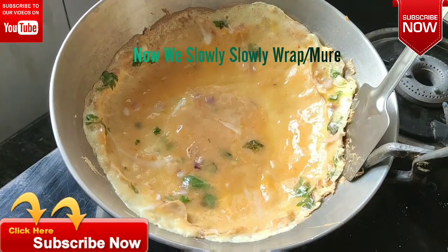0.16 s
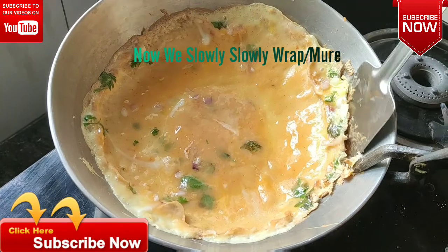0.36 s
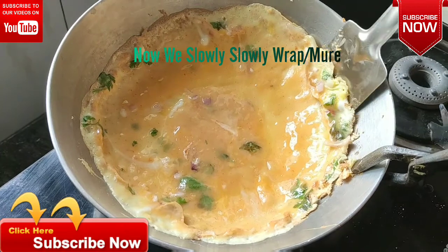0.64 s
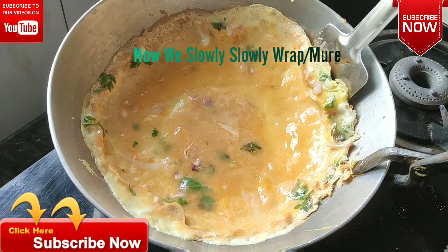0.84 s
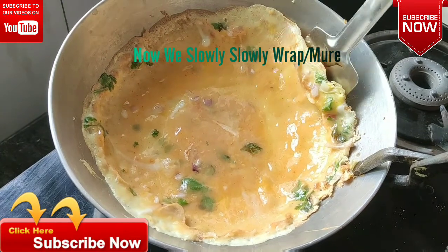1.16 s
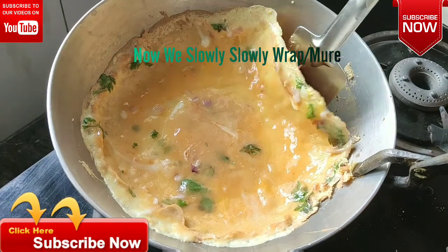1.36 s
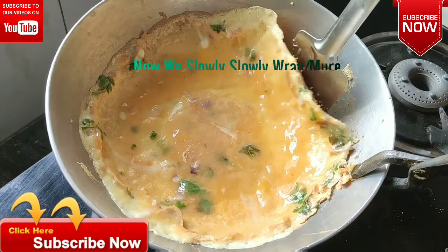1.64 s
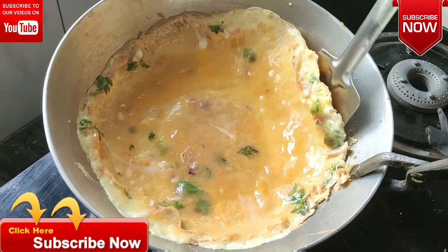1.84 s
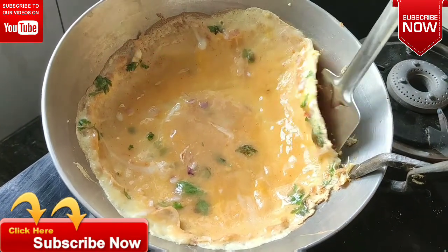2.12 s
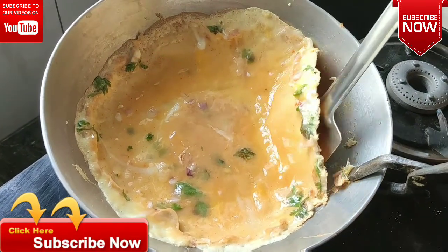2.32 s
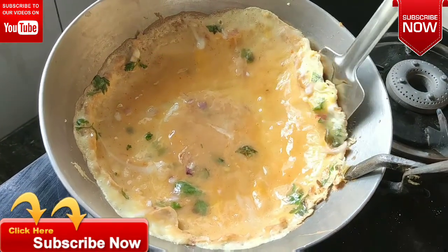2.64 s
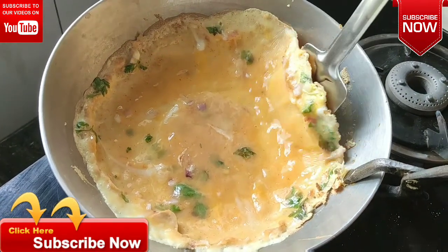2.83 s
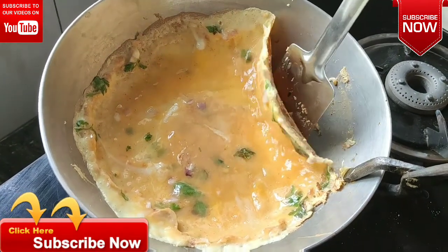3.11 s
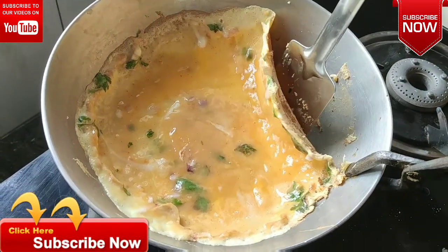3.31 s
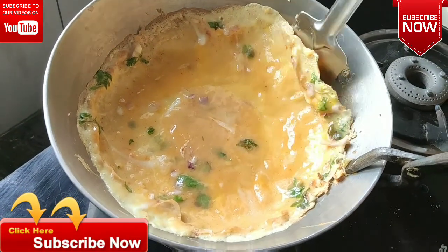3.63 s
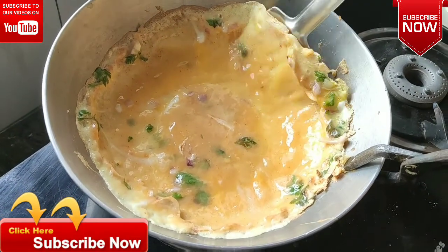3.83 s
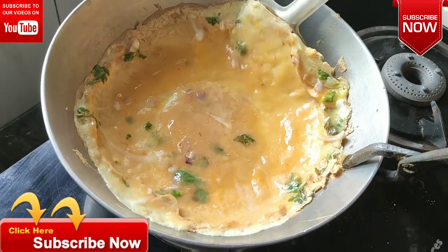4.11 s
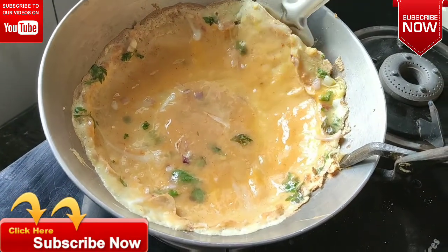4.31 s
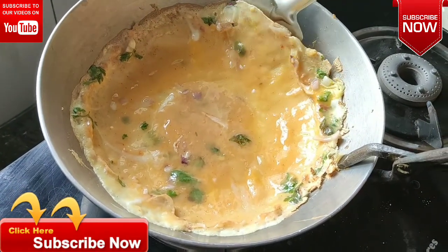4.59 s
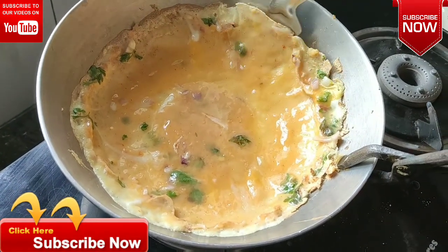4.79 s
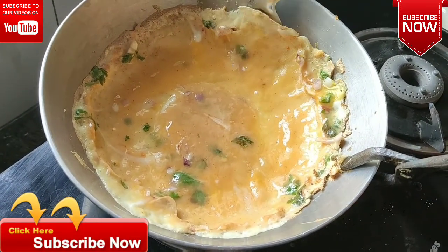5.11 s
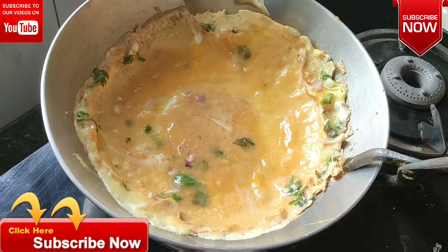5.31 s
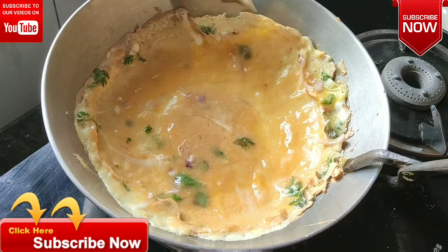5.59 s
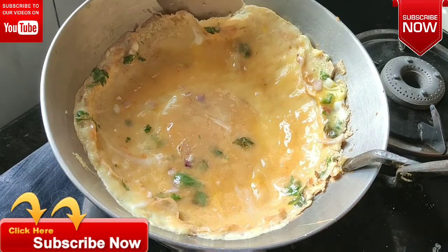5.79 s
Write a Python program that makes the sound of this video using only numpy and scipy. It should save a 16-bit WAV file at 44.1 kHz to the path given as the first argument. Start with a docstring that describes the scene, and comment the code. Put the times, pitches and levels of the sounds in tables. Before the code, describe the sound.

Close stereo microphone in a small home kitchen. A very loud, bright spatula clank on a metal pan comes almost at once, another strong knock around one and a half seconds, then short scrapes with faint squeaks. Oil spits and crackles lightly. Dull woody pounding repeats about once a second from next door.

```python
"""Spatula scraping a metal pan

A steel blade scrapes, squeaks and knocks close to a two-port microphone: shaped noise and grains,
resonated noise, and noise bursts with pan modes. Oil under the omelette spits in short noise bursts.
Someone pounds steadily next door: decaying low and woody modes. The kitchen hums and reflects;
a low rumble of filtered noise swells."""
import sys
import numpy as np
from scipy import signal
from scipy.fft import rfft, irfft
from scipy.io import wavfile
from scipy.ndimage import uniform_filter1d

SR = 44100
rng = np.random.default_rng(int(sys.argv[2]) if len(sys.argv) > 2 else 0)


def unload_audio(sound):
    """Save the sound as a 16-bit wav file, at the path given as the first command line argument."""
    columns = np.transpose(np.atleast_2d(sound))
    # keep every value between -1 and 1, then stretch to whole-number steps
    steps = np.round(np.clip(columns, -1, 1) * 32767)
    wavfile.write(sys.argv[1], SR, steps.astype(np.int16))


N = 262395


def amp(db):
    """Amplitude factor of a level in dB."""
    return 10 ** (np.asarray(db) / 20)


def evened(x):
    """Scales to unit rms over all channels."""
    return x / np.sqrt(np.mean(x ** 2) + 1e-20)


def read(points, hz):
    """Interpolates a (hz, value) table on a log frequency axis."""
    f, value = np.transpose(points)
    return np.interp(np.log(hz + 1), np.log(f + 1), value)


def add(mix, start_s, sound):
    """Adds a two-port sound in place, cut at the end of the mix."""
    part = mix[:, round(start_s * SR):][:, :sound.shape[1]]
    part += sound[:, :part.shape[1]]


def colour(x, points):
    """Shapes the spectrum of each channel."""
    gain_db = read(points, np.fft.rfftfreq(x.shape[1], 1 / SR))
    return irfft(rfft(x) * amp(gain_db), x.shape[1])


def band(x, lo_hz, hi_hz):
    """Butterworth bandpass, top edge at most 20 kHz."""
    sos = signal.butter(2, [lo_hz, min(hi_hz, 20000)], "band", fs=SR, output="sos")
    return signal.sosfilt(sos, x)


def resonate(x, hz, width_hz):
    """Resonance on a fixed or gliding pitch: shift it to zero, smooth, shift back."""
    turn = np.exp(2j * np.pi * np.cumsum(hz * np.ones(x.shape[-1])) / SR)
    r = np.exp(-np.pi * width_hz / SR)
    return 2 * (turn * signal.lfilter([1 - r], [1, -r], x / turn)).real


def sides(left_right_db):
    """Port gains that split a left-right level difference evenly."""
    return amp(np.array([[.5], [-.5]]) * left_right_db)


def ring(modes, t, spread_db):
    """Decaying modes; each port hears each with its own phase and strength."""
    hz, db, t60_s = np.transpose(modes)[:, :, None, None]
    phase, chance = rng.random((2, len(modes), 2, 1))
    level_db = db + spread_db * (chance - .5) - 60 * t / t60_s
    return amp(level_db) * np.sin(2 * np.pi * (hz * t + phase))


def crackle(per_s, spread_db):
    """Random clicks at shared moments, each smeared differently at the two ports."""
    strength = amp(spread_db * np.minimum(rng.exponential(1, N), 5))
    clicks = strength * (rng.random(N) < per_s / SR)
    kind, out = rng.integers(0, 12, N), np.zeros((2, N))
    for k in range(12):
        grain = rng.standard_normal((2, 64)) * np.exp(-np.arange(64) / 32.0)
        out += signal.oaconvolve(clicks[None] * (kind == k), grain, axes=1)[:, :N]
    return evened(out)


def burst(t, bright_hz, low_db, low_hz, t60_s):
    """A dying rattle of noise: a broad bright band over a duller low one."""
    noise = rng.standard_normal((2, len(t))) * amp(-60 * t / t60_s)
    bright = band(band(noise, 0.53 * bright_hz, 1.35 * bright_hz), 2100, 14700)
    low = band(noise, 0.5 * low_hz, 1.92 * low_hz)
    return bright / abs(bright).max() + amp(low_db) * low / abs(low).max()


END_DB, ROUNDNESS = -10, 1.69  # level at the ends of rise and fall; 1 pointed, 2 round


def hump(t, loudest_s, rise_s, fall_s):
    """Level in dB of a movement that speeds up until loudest_s and slows down."""
    span_s = np.where(t < loudest_s, rise_s, fall_s)
    return END_DB * abs((t - loudest_s) / span_s) ** ROUNDNESS


# room tone spectrum: (pitch_hz, relative_level_db)
AIR_SPECTRUM = [(12, -32), (20, 10.5), (154, -2.5), (172, -4), (204, -9.5), (241, -0.5), (434, -8.5),
                (542, -10.5), (717, -10), (848, -10.5), (1760, -12), (2130, -15), (2990, -12.5),
                (4300, -15.5), (16000, -22)]
AIR_DB = -52.5
# likeness of the ports: (pitch_hz, correlation from -1 to 1)
PORT_LIKENESS = [(60, 0.85), (180, 1), (550, 0.61), (1650, -0.07), (4970, -0.045), (15000, -0.13)]
# hum lines: (pitch_hz, level_db rms)
HUM_LINES = [(64.6, -64), (199.2, -61), (436.0, -71.5), (721.4, -69)]


def hush():
    """Room tone as coloured noise, alike at both ports in the bass, with wavering hum lines."""
    a, b = rfft(rng.standard_normal((2, N)))
    same = np.clip(read(PORT_LIKENESS, np.fft.rfftfreq(N, 1 / SR)), -1, 1)
    pair = irfft(np.array([a, same * a + np.sqrt(1 - same ** 2) * b]), N)
    hum = sum(amp(db) * evened(resonate(pair, hz, 9.8)) for hz, db in HUM_LINES)
    return amp(AIR_DB) * evened(colour(pair, AIR_SPECTRUM)) + hum


RUMBLE_FULL_S, RUMBLE_DB, RUMBLE_DB_PER_S = 5.885, -47, 55


def rumble():
    """Low noise, nearly alike at both ports, swells and then holds."""
    noise = rng.standard_normal((2, N))
    low = evened(band(noise[0] + 0.55 * noise, 100, 650))
    before_full_s = np.minimum(np.arange(N) / SR - RUMBLE_FULL_S, 0)
    return amp(RUMBLE_DB + RUMBLE_DB_PER_S * before_full_s) * low


# decay of the reflections: (pitch_hz, t60_s)
KITCHEN_DECAY = [(250, 0.65), (700, 0.38), (2000, 0.31), (5000, 0.37), (12000, 0.29)]


def kitchen(x):
    """Dense reflections, each band dying at its own speed, other ones at each port."""
    hz, t, z = signal.stft(rng.standard_normal((2, SR)), SR, nperseg=256)
    decay = amp(-60 * t / read(KITCHEN_DECAY, hz)[:, None])
    tail = signal.istft(z * decay, SR, nperseg=256)[1]
    tail = tail * np.minimum(np.arange(tail.shape[1]) / 130.0, 1)
    return signal.fftconvolve(x, tail / np.linalg.norm(tail[0]), axes=1)[:, :N]


# dull blows besides the steady beats: (start_s, low_db, upper_db, favoured_hz)
EXTRA_BLOWS = [(1.588, -48, -58, 1496), (2.05, -41, -42, 1180), (2.087, -46, -52, 667),
               (2.686, -41, -51.5, 750), (3.361, -38, -50, 1340), (4.937, -48.5, -60, 1180),
               (5.15, -48, -59, 1180), (5.19, -46, -60, 1310)]
# woody upper modes: (pitch_hz, relative_level_db, t60_s)
WOODY_MODES = [(671, 3.5, 0.11), (750, -0.5, 0.11), (843, 11.5, 0.022), (1180, 8, 0.03)]
FIRST_BLOW_S, PERIOD_S, SLOWING_S = .4, 1.086, .003  # each gap SLOWING_S longer than the last
BLOW_DB, BLOW_UPPER_DB, BLOW_UPPER_HZ, THUD_HZ = -38, -46, 712.6, 300
BOOM_DB, BOOM_T60_S = -17, .45  # lingering low body, relative to the low part


def thuds():
    """A heavy low mode that builds up, woody upper ones and a slap of noise, smeared by the walls between."""
    out, t, k = np.zeros((2, N)), np.arange(SR // 3) / SR, np.arange(6)
    beats_s = FIRST_BLOW_S + k * PERIOD_S + k * (k - 1) / 2 * SLOWING_S
    steady = [(s, BLOW_DB, BLOW_UPPER_DB, BLOW_UPPER_HZ) for s in beats_s]
    for start_s, low_db, upper_db, favoured_hz in steady + EXTRA_BLOWS:
        swell = t / .009 * np.exp(1 - t / .009)
        low = np.sin(2 * np.pi * THUD_HZ * t) * swell
        boom = rng.standard_normal(len(t)) + .4 * rng.standard_normal((2, len(t)))
        boom = resonate(resonate(boom, THUD_HZ, 130), THUD_HZ, 130)
        boom_level = amp(BOOM_DB - 60 * t / BOOM_T60_S) * np.minimum(t / .012, 1)
        low = low + evened(boom) * boom_level
        favoured = 1.93 * np.sin(2 * np.pi * favoured_hz * t) * amp(-60 * t / 0.07)
        slap = 6.56 * band(rng.standard_normal((2, len(t))), 360, 1750) * amp(-60 * t / 0.24)
        upper = ring(WOODY_MODES, t, 12.0).sum(0) + favoured + slap
        rise = np.minimum(t / .005, 1)
        add(out, start_s, amp(low_db) * low + amp(upper_db) * upper * rise)
    return out


# bubbles bursting in the oil: (start_s, level_db, bright_hz, left_right_db, low_db under the bright part)
BUBBLES = [(0.199, -27, 9750, -7, -15), (0.8957, -29, 9620, -11, -20), (0.9237, -32, 10100, -4.0, -20),
           (0.9527, -33.5, 3910, -6, -18), (1.0959, -38, 10400, -7, -20), (1.2471, -29, 7920, -1.0, -22),
           (1.2936, -28.5, 10600, -2, -24), (1.9016, -18.5, 9500, -2.0, -8.5), (2.0113, -28, 7000, 3, -20),
           (2.1805, -28.5, 3420, -1, -8), (2.1939, -24.5, 9050, -1.5, -27),
           (2.809, -35.5, 10700, -4.5, -18), (2.8394, -31.5, 9630, -3, -6),
           (2.8834, -27.5, 7450, -1.0, -25), (3.0637, -38.5, 3990, -0.5, -20),
           (3.251, -37, 4070, -4.0, -10), (3.4394, -32, 5500, -4.0, -17), (3.707, -31, 9500, -8, -22),
           (3.8321, -26.5, 9930, -1, -17), (3.8689, -20, 7900, -6.5, -22), (3.9392, -27.5, 9240, -5.0, -24),
           (3.9802, -30.5, 3900, -1, -12), (4.1084, -25, 10300, -1.0, -25), (4.228, -28.5, 4900, -0.5, -13),
           (4.2857, -27, 11400, -1.5, -20), (4.5792, -27, 10100, -9, -21), (4.6133, -22.5, 9700, 1, -20),
           (5.276, -27.5, 11000, -6.0, -20), (5.2977, -18.5, 8870, -6, -18.5),
           (5.3412, -20.5, 10700, -5.5, -19.5), (5.6134, -30.5, 5320, -7, -13),
           (5.6473, -21.5, 8700, -5.0, -21), (5.882, -27, 12000, -6.0, -20)]


def pops():
    """Each bubble is a snap of milliseconds and a short splutter; small ones fall at random."""
    out, t = np.zeros((2, N)), np.arange(1200) / SR
    for start_s, level_db, bright_hz, left_right_db, low_db in BUBBLES:
        snap = burst(t, bright_hz, low_db, 1400, .004)
        snap = snap[0] + .5 * snap  # first wave front nearly alike at both ports
        splutter = 0.37 * burst(t, bright_hz, low_db, 1500, 0.092)
        add(out, start_s, amp(level_db) * sides(left_right_db) * (snap + splutter))
    return out + amp(-58.5) * band(crackle(60, 3.2), 2500, 15000)


# squeaks of the free part of the blade:
# (loudest_s, rise_s, fall_s, level_db, centre_hz, glide_hz_per_s)
BLADE_SQUEAKS = [(1.845, .05, .04, -46, 1665, 2000), (1.915, .01, 0.017, -50, 1690, 0),
                 (1.984, 0.042, 0.031, -45, 1590, -2500), (2.12, 0.039, 0.053, -43.5, 1680, 300),
                 (2.33, 0.039, 0.05, -42, 1660, -1200), (2.405, .03, .06, -51.5, 1280, -800),
                 (3.635, 0.065, 0.057, -46.5, 1280, 1197.5), (3.765, 0.059, 0.022, -49, 1200, -2000),
                 (3.895, .05, 0.034, -49.5, 1155, 300), (3.974, 0.013, 0.016, -52, 1130, 0),
                 (4.648, .015, .03, -54, 1100, 0), (4.895, .04, 0.034, -54, 1180, 300),
                 (5.125, 0.037, .02, -53, 1150, -2), (5.45, .04, 0.036, -52.5, 1300, 0),
                 (5.741, 0.048, 0.036, -48.5, 1550, 495)]
# blade modes that a squeak passes: (pitch_hz, width_hz)
BLADE_MODES = [(1150, 24), (1320, 39), (1550, 66), (1740, 29)]


def songs():
    """Friction drives the blade: a fuzzy, fluttering band and a fainter octave."""
    out, t = np.zeros((2, N)), np.arange(-.2, .2, 1 / SR)
    for loudest_s, rise_s, fall_s, level_db, centre_hz, glide in BLADE_SQUEAKS:
        hz = centre_hz + glide * np.clip(t, -rise_s, fall_s)
        *rub, flutter = rng.standard_normal((3, len(t)))
        rub = np.array(rub) * amp(1.3 * evened(uniform_filter1d(flutter, size=500)))
        shared_rub = rub + 0.31 * rub[::-1]
        song = evened(resonate(resonate(shared_rub, hz, 230), hz, 230))
        song = evened(song + sum(resonate(song, f, width) for f, width in BLADE_MODES))
        octave = evened(resonate(resonate(rub, 2 * hz, 500), 2 * hz, 500))
        level = amp(level_db + hump(t, 0, rise_s, fall_s))
        add(out, loudest_s + t[0], level * (song + 0.32 * octave))
    return out


PATCHY_DB = 3.0  # rms


def mottle(x, lower_db, patchy_db):
    """Narrow bands light up and fade at random; the lower half gets its own gain."""
    hz, t, z = signal.stft(x, SR, nperseg=1024, noverlap=896)
    field = rng.standard_normal(z.shape[1:])
    for _ in range(2):
        field = uniform_filter1d(uniform_filter1d(field, size=3, axis=0), size=16, axis=1)
    lower = 1 / (1 + (hz / 6000.0) ** 4)
    lower_gain_db = np.outer(lower, np.interp(t, np.arange(N) / SR, lower_db))
    z = z * amp(patchy_db * evened(field) + lower_gain_db)
    return signal.istft(z, SR, nperseg=1024, noverlap=896)[1][:, :N]


# spectrum of the rub: (pitch_hz, relative_level_db)
RUB_SPECTRUM = [(180, -7.5), (300, -7), (528, -10), (678, -10.5), (1040, -10), (1750, -8), (2210, -10.5),
                (3290, -5.5), (5070, -3.5), (6090, -6), (9550, -5), (13100, -9), (16000, -17.5)]
# steady sizzle and light drag: (time_s, level_db, lower_half_gain_db)
SIZZLE_CURVE = [(0, -51.5, 2), (.25, -43.5, -7.5), (.42, -38, -6.5), (.7, -44, -6), (.93, -49, -4),
                (1.02, -54.5, -8), (1.4, -54, -3), (1.65, -53, -12), (2.25, -43, -4), (2.5, -45.5, -1),
                (2.65, -52, 1), (2.95, -61, -2), (3.34, -60.5, -16), (3.39, -46, -6), (3.82, -50.5, -4.5),
                (4.2, -52.5, -4), (4.6, -40.5, -3), (4.8, -42.5, -5), (5.25, -47.5, -6.5), (5.95, -44, -8)]
# strokes over the pan: (loudest_s, rise_s, fall_s, level_db, lower_half_gain_db)
BLADE_STROKES = [(.13, 0.035, 0.019, -40.5, -3.5), (.79, 0.018, 0.033, -47, -9.5),
                 (.9, 0.05, 0.049, -46, -3), (1.25, 0.015, 0.015, -42.5, -4),
                 (1.495, 0.049, 0.047, -50.5, 2.5), (1.715, 0.044, 0.049, -40, -1.5),
                 (1.838, 0.057, 0.055, -39, 0), (1.915, .02, 0.025, -39, -4.5),
                 (1.985, 0.048, 0.039, -37, -1.5), (2.11, 0.099, 0.073, -41, -2),
                 (2.185, 0.018, 0.02, -38.5, 2), (2.33, 0.055, 0.103, -37, -7),
                 (2.445, 0.052, 0.043, -41, -5), (2.59, .03, .05, -51, 4.5),
                 (2.72, 0.056, 0.025, -48.5, -10.5), (2.845, .03, .02, -53, 3),
                 (3.255, .02, 0.026, -56, 3.5), (3.63, 0.053, 0.046, -37.5, -0.5),
                 (3.772, 0.06, 0.034, -42, 3), (3.885, .04, 0.035, -40, -4.5), (4.0, 0.033, 0.039, -41, -1),
                 (4.04, 0.035, 0.048, -34, -7.5), (4.1, 0.036, 0.1, -40, -5.5), (4.27, .05, .04, -37.5, -5),
                 (4.344, .05, .06, -27.5, -8), (4.415, 0.025, 0.044, -36.5, 0.5),
                 (4.53, 0.046, 0.038, -37, -6), (4.675, 0.056, .05, -46, -3),
                 (4.894, .05, 0.061, -38, -1.5), (5.065, .05, 0.048, -37.5, -3.5),
                 (5.168, 0.045, 0.033, -33.5, -3), (5.305, 0.034, 0.029, -44, 1),
                 (5.435, 0.05, 0.072, -36.5, -2.5), (5.6, 0.057, .03, -40.5, -2.5),
                 (5.725, 0.046, 0.091, -34.5, -4.5), (5.91, .06, 0.099, -44.5, -1)]


def scrape():
    """Stick-slip grains and hiss under the blade edge; the powers of sizzle and strokes add."""
    t = np.arange(0, N / SR, .002)
    time_s, level_db, lower_db = np.transpose(SIZZLE_CURVE)
    power = amp(2 * np.interp(t, time_s, level_db))
    lower = power * np.interp(t, time_s, lower_db)  # power-weighted gain in dB
    for loudest_s, rise_s, fall_s, level_db, lower_db in BLADE_STROKES:
        stroke = amp(2 * (level_db + hump(t, loudest_s, rise_s, fall_s)))
        power = power + stroke
        lower = lower + stroke * lower_db
    sample_s = np.arange(N) / SR
    level = np.interp(sample_s, t, np.sqrt(power))
    lower_db = np.interp(sample_s, t, lower / power)
    rub = 0.66 * rng.standard_normal((2, N)) + 0.45 * crackle(1500, 4.6)
    return level * evened(mottle(colour(rub, RUB_SPECTRUM), lower_db, PATCHY_DB))


# blade knocking the pan:
# (start_s, level_db, bright_hz, low_db under the bright part, low_hz, t60_s, left_right_db)
PAN_KNOCKS = [(0.0265, -20.5, 5700, -6, 2330, 0.029, 0.5), (0.1225, -30.5, 8000, -5.5, 570, 0.078, -2),
              (0.16, -26, 9700, -25, 1540, 0.024, -3), (0.2619, 7.5, 10200, -13, 2370, 0.064, 1.5),
              (1.1359, -27, 10200, -13.5, 766, 0.051, -2.5), (1.555, -4.5, 7000, -13, 1600, 0.047, 0.5),
              (3.36, -15.5, 4100, -15.5, 501, 0.029, -3), (3.4743, -20.5, 4540, -11, 1100, 0.063, -2)]
# clusters of close pan modes: (pitch_hz, width_hz before a 90 Hz minimum, relative_level_db)
PAN_MODES = [(677, 130, -10), (880, 73, -22), (2396, 130, -10), (3180, 35, -6), (4540, 173, -8),
             (5500, 60, -1), (5933, 260, 1.5), (6580, 73, -5), (6700, 20, -0.5), (6970, 92, 8.5),
             (7800, 15, -12.5), (7970, 74, 7.5), (8820, 51, 4), (9240, 24, 3.5), (9550, 36, 3.5),
             (9800, 24, 2.5), (10200, 43, 5), (10920, 22, -3), (10940, 380, 6.5), (12000, 200, 0),
             (13370, 48, -1)]
DULLING_DB_PER_OCTAVE = 4.5  # for pan modes above a knock's bright_hz


def knocks():
    """The contact rattle, the pan's fuzzy ring and a jolt through the stove top, rising in 1.5 ms."""
    out, t = np.zeros((2, N)), np.arange(SR // 2) / SR
    for start_s, level_db, bright_hz, low_db, low_hz, t60_s, left_right_db in PAN_KNOCKS:
        noise = rng.standard_normal((2, len(t)))
        modes = 0
        for hz, width_hz, mode_db in PAN_MODES:
            dulling_db = DULLING_DB_PER_OCTAVE * max(np.log2(hz / bright_hz), 0)
            modes = modes + amp(mode_db - dulling_db) * evened(resonate(noise, hz, max(width_hz, 90)))
        modes = 0.5 * evened(modes) * amp(-60 * t / (1.5 * t60_s))  # a deader contact also damps the ring
        jolt = evened(band(noise[0], 50, 330)) * amp(low_db - 17.5 - 60 * t / 0.083)
        sound = burst(t, bright_hz, low_db, low_hz, t60_s) + modes + jolt
        rise = np.minimum(t / .0015, 1)
        add(out, start_s, amp(level_db) * sides(left_right_db) * sound * rise)
    return out


def scene():
    """Sums the direct sounds and the reflections of knocks, pops and thuds."""
    far = thuds()
    near = pops() + knocks()
    reflections = kitchen(amp(-9.5) * near + amp(-4.5) * far)
    return hush() + rumble() + reflections + far + songs() + scrape() + near


# difference between the ports: (pitch_hz, left_right_db)
PORT_COLOUR = [(60, -1.5), (130, 0), (290, 0), (640, -1.5), (1410, -1), (3100, -3.5), (6820, -1.5),
               (15000, -5)]
EDGE_HZ = 16100


def record(dry):
    """The two ports differ in colour; the loudest knock clips; then the band limit."""
    hz = np.fft.rfftfreq(N, 1 / SR)
    ports = irfft(rfft(dry) * sides(read(PORT_COLOUR, hz)), N)
    clipped = np.clip(ports, -1, 1)
    lowpass = signal.firwin(511, EDGE_HZ, window=("kaiser", 9), fs=SR)
    return signal.oaconvolve(clipped, lowpass[None], "same")


dry = scene()
out = record(dry)
unload_audio(out)
```